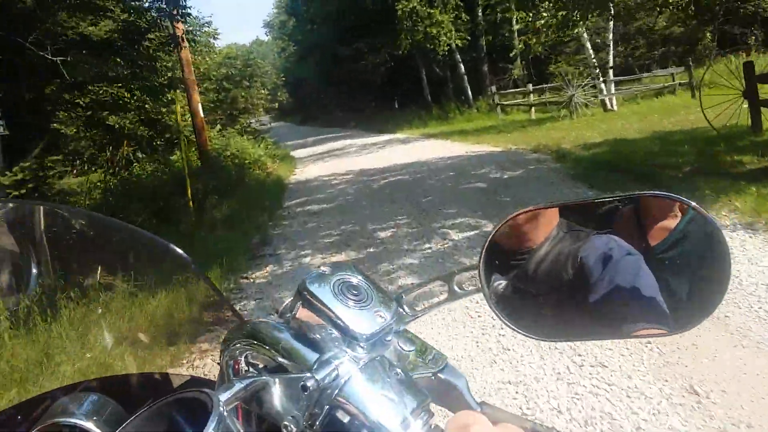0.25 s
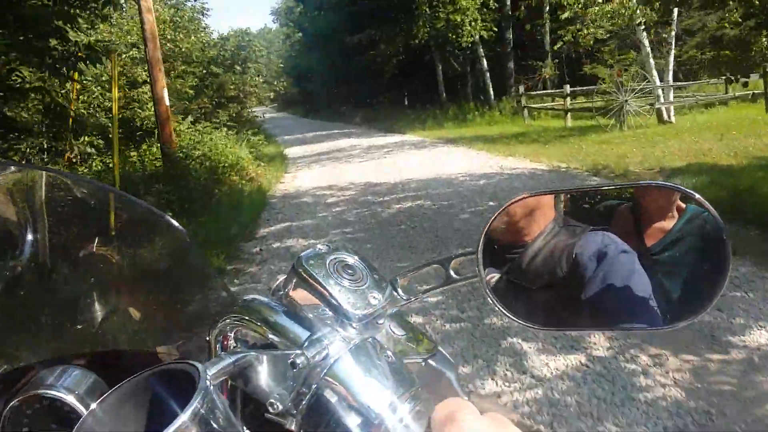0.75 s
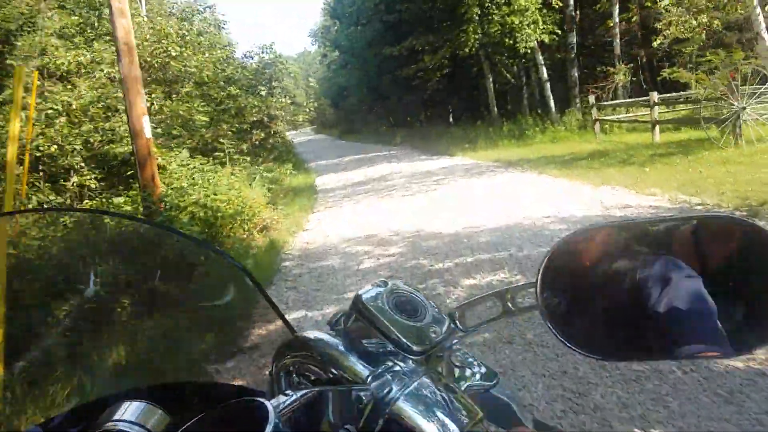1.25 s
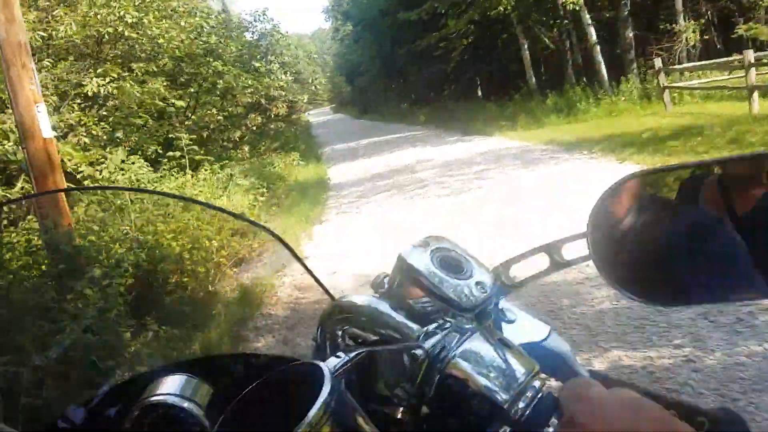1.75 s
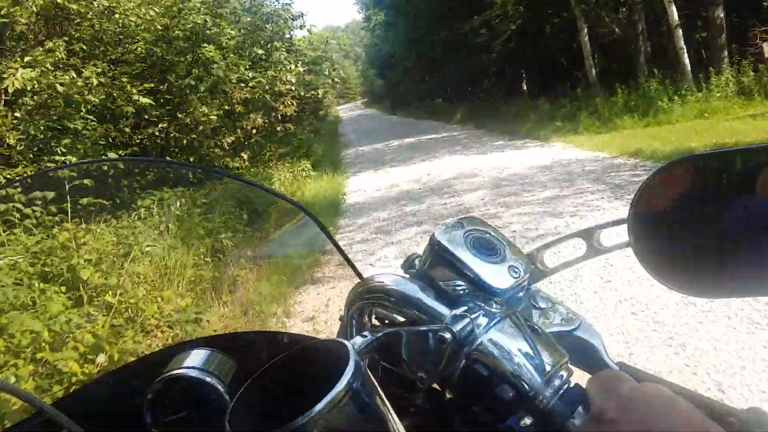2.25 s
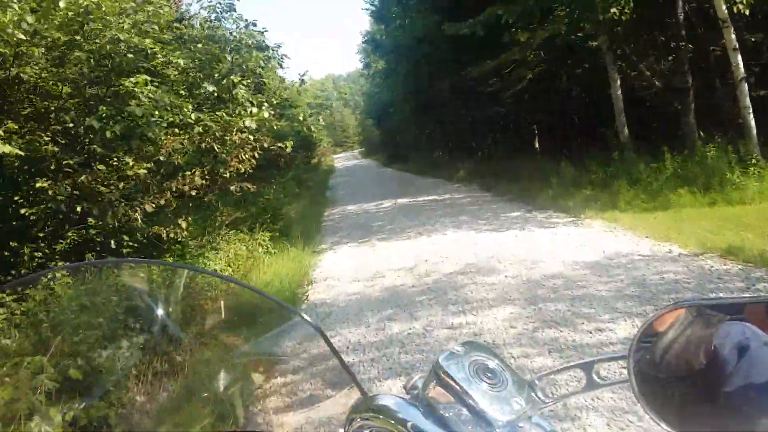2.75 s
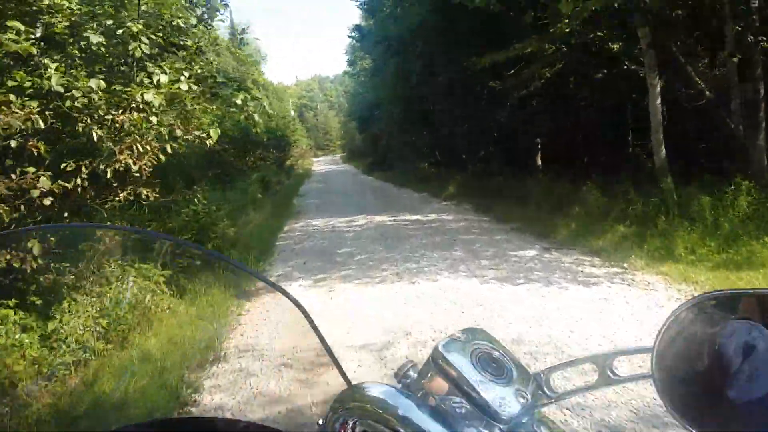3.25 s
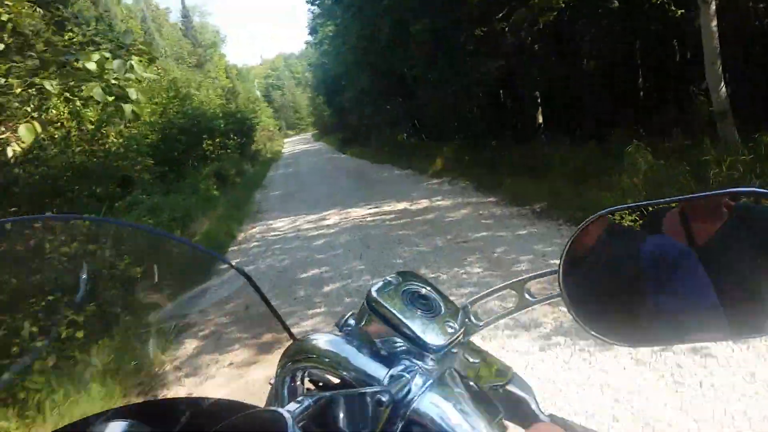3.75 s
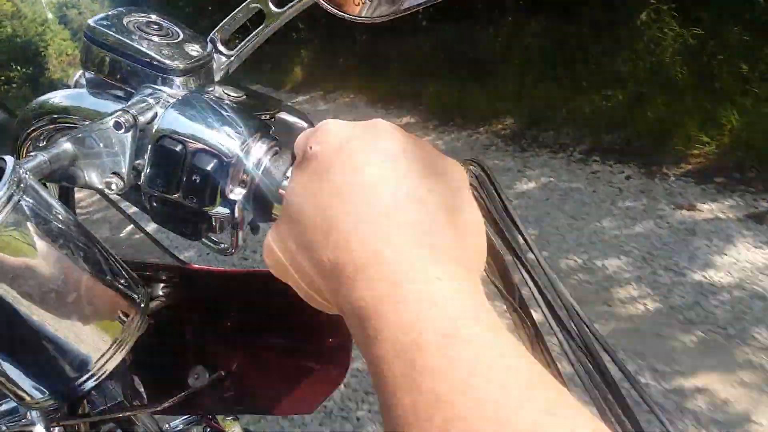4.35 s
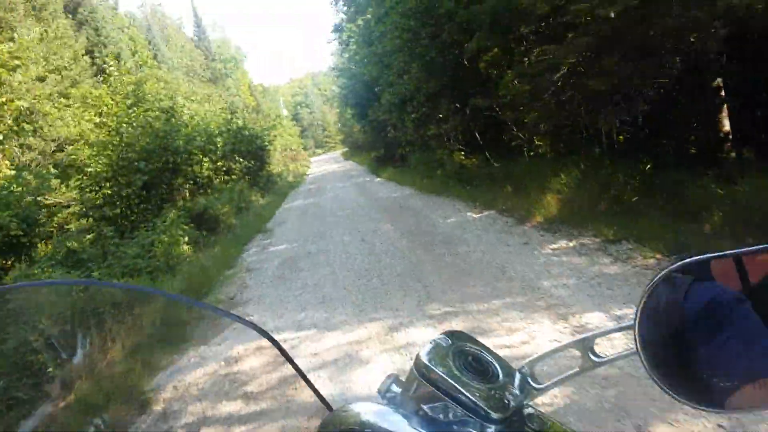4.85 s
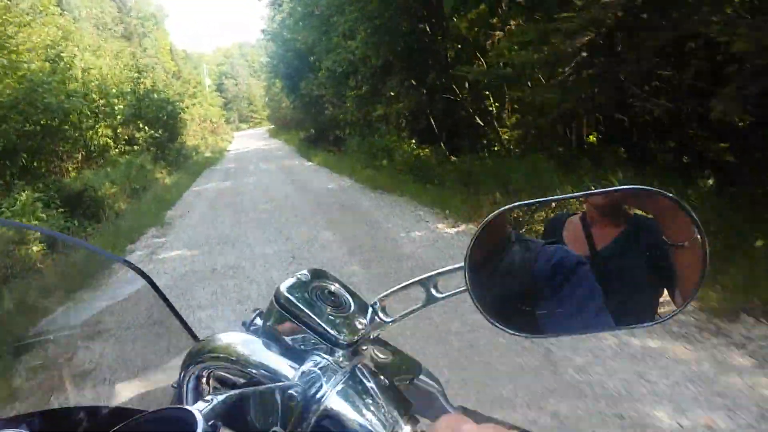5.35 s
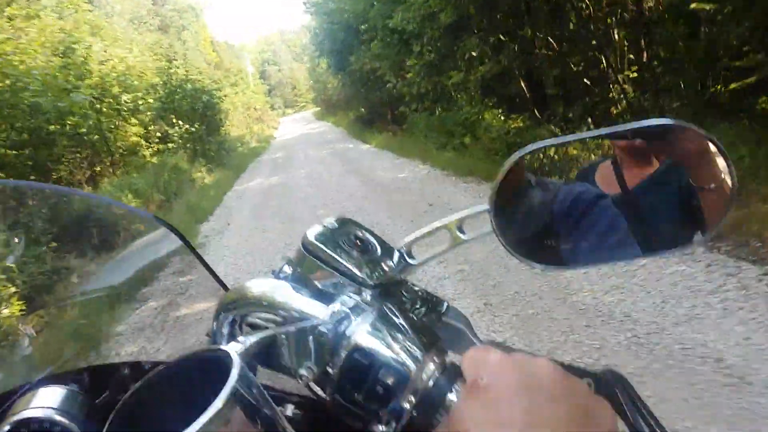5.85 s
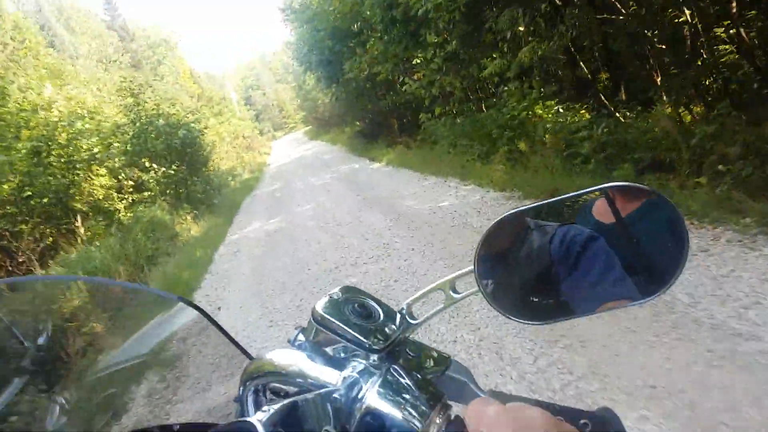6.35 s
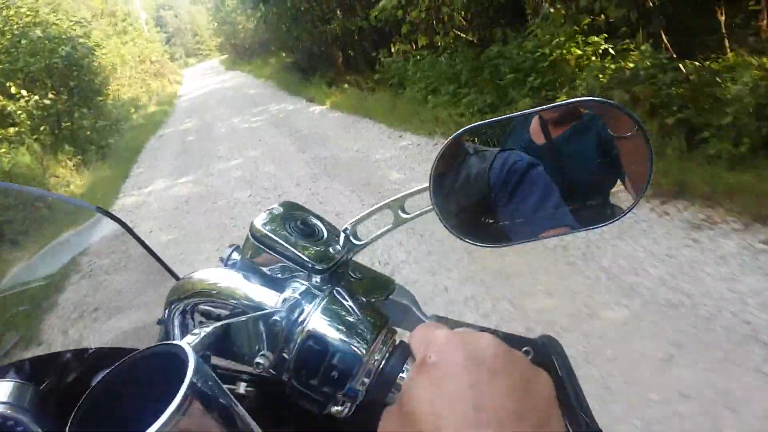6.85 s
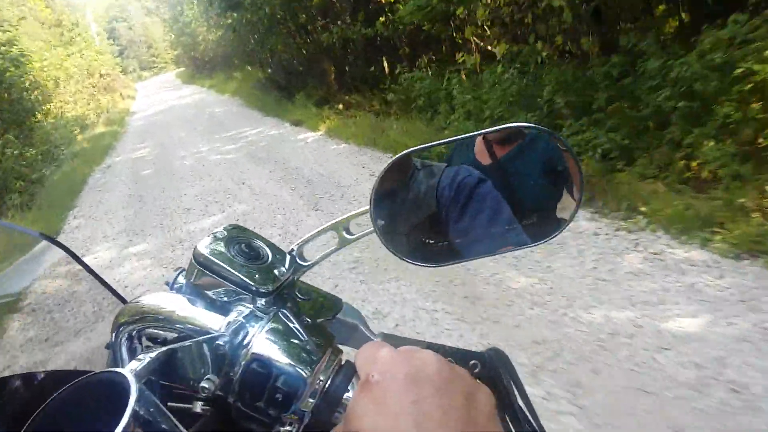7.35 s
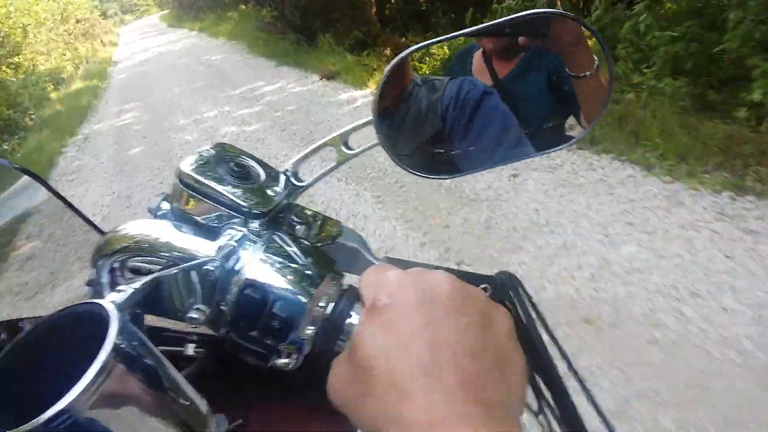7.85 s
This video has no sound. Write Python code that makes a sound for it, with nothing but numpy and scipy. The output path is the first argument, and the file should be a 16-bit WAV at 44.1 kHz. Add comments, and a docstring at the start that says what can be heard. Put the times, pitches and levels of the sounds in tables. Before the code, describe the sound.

A big motorcycle engine chugs steadily at low revs, heard from the seat, with tyres rumbling and crunching over gravel.

```python
"""Gravel road, from the rider's seat of a big V-twin cruiser chugging at low, steady revs.
Tyres rumble and crunch over stones; exhaust and bike give short, dull pops and knocks. Valve gear
clatters in a fixed order each cycle over the rustle of chain and gears. Gas pulses ring the pipes:
the front cylinder beats evenly, the rear one keeps falling into a miss-and-catch lope."""
import sys
import numpy as np
from scipy import signal
from scipy.fft import rfft, irfft, next_fast_len
from scipy.io import wavfile
from scipy.ndimage import uniform_filter1d

SR = 44100
rng = np.random.default_rng(int(sys.argv[2]) if len(sys.argv) > 2 else 0)


def wav_record(signal):
    """Record a signal, one row per channel, as 16-bit PCM in the file named by sys.argv[1]."""
    frames = np.transpose(np.atleast_2d(signal))
    bounded = np.clip(frames, -1, 1)
    # unit amplitude maps onto the largest positive 16-bit level
    quanta = np.round(bounded * 32767).astype(np.int16)
    wavfile.write(sys.argv[1], SR, quanta)


N = 356769
TIME_S = np.arange(N) / SR
FFT_SIZE = next_fast_len(N + SR // 2)
FREQ_HZ = np.maximum(np.arange(FFT_SIZE // 2 + 1) * SR / FFT_SIZE, 1e-3)


def undb(db):
    """Decibels to gain."""
    return 10 ** (np.asarray(db) / 20)


def level(x, rms_db):
    """Scale to an rms level."""
    return x * undb(rms_db) / np.sqrt(np.mean(x ** 2))


def curve(points):
    """Rows of (time_s, value), interpolated per sample."""
    return np.interp(TIME_S, *np.transpose(points))


def filtered(x, response):
    """Apply a frequency response."""
    return irfft(rfft(x, FFT_SIZE) * response, FFT_SIZE)[..., :N]


def colour(points):
    """Minimum-phase response from rows of (freq_hz, gain_db)."""
    hz, db = np.transpose(points)
    cepstrum = irfft(np.log(undb(np.interp(np.log(FREQ_HZ), np.log(hz), db))))
    cepstrum[1:FFT_SIZE // 2] *= 2
    cepstrum[FFT_SIZE // 2 + 1:] = 0
    return np.exp(rfft(cepstrum))


def resonance(hz, width_hz):
    """Band-pass response, gain 1 at the centre."""
    return 1 / (1 + 1j * (FREQ_HZ / hz - hz / FREQ_HZ) * hz / width_hz)


def clicks(times_s, sizes):
    """One impulse at each time."""
    return np.bincount(np.clip(times_s * SR, 0, N).astype(int), sizes, N + 1)[:N]


def bursts(times_s, sizes, decay_s):
    """Envelope that jumps at each time and decays."""
    return signal.lfilter([1], [1, -np.exp(-1 / (decay_s * SR))], clicks(times_s, sizes))


def scatter(events, spread_db):
    """One random gain around 1 per event."""
    return undb(spread_db * rng.standard_normal(len(events)))


def sway(rate_hz):
    """Slow random drift, spread near 1."""
    hold = int(SR / rate_hz)
    steps = np.repeat(rng.standard_normal(N // hold + 1), hold)
    return 1.7 * uniform_filter1d(uniform_filter1d(steps, hold), hold)[:N]


def pan(x, right_db):
    """Stereo balance, right over left."""
    return x * undb(np.array([[-right_db], [right_db]]) / 2)


def from_below(x, right_db):
    """Sound from below reaches the left side sooner, and again off the tank and screen."""
    lead_s, echo_s, echo_db = 0.00024, 0.004, -17.5
    direct = np.exp(2j * np.pi * FREQ_HZ * lead_s)
    echo = undb(echo_db) * np.exp(-2j * np.pi * FREQ_HZ * echo_s)
    return pan(np.array([filtered(x, direct + echo), x]), right_db)


def crank(phase_cycles):
    """Times in seconds at which the engine passes a phase of its four-stroke cycle."""
    # engine speed: time_s, cycle_rate_hz
    speed = [(0.0, 15.905), (0.79, 15.78), (2.37, 15.875), (2.57, 15.528), (2.96, 15.646), (3.16, 15.983),
             (3.55, 16.071), (3.75, 15.802), (5.33, 16.023), (5.52, 16.221), (6.51, 15.677), (6.71, 15.931),
             (7.5, 15.771), (7.7, 15.531), (8.09, 15.739)]
    cycles = np.cumsum(curve(speed)) / SR - 0.11
    return np.interp(np.arange(int(cycles[-1]) + 1) + phase_cycles, cycles, TIME_S, right=2 * N / SR)


def road_rumble():
    """Tyres rolling on the road: low noise, part direct, part diffuse."""
    # rumble spectrum: freq_hz, gain_db
    spectrum = [(15, -8.5), (35, -16), (55, -13), (85, -2.5), (130, 2.5), (220, 6.5), (320, 2.5),
                (500, -7.5), (900, -11.5), (2000, -63.5)]
    rumble = level(filtered(rng.standard_normal((3, N)), colour(spectrum)), 0)
    return from_below(rumble[0], right_db=2.6) * undb(-32) + rumble[1:] * undb(-24.5)


def gravel(treble_db):
    """Stones crack under the tyres, a few of them loudly."""
    # crack spectrum: freq_hz, gain_db
    spectrum = [(1000, 10.5), (4000, 24.5), (7000, 7), (9000, -17.5), (12000, -3.5), (15500, -6.5)]
    # loud single stones: start_s, relative_db
    stones = [(0.9278, -36), (1.55, -39), (3.689, -47), (5.473, -38), (6.1115, -37), (7.8291, -36)]
    count = 9000
    patches_db = 4.5 * sway(rate_hz=20)  # loose and packed ground
    sides = []
    for _ in range(2):
        sizes = undb(4.6 * np.minimum(rng.exponential(size=count), 6)) * rng.choice([-1, 1], count)
        sides.append(clicks(rng.uniform(0, N / SR, count), sizes))
    chip = rng.standard_normal(SR // 100) * np.exp(-TIME_S[:SR // 100] / 0.00077)
    crunch = filtered(np.array(sides), colour(spectrum) * rfft(chip, FFT_SIZE))
    start_s, relative_db = np.transpose(stones)
    cracks = bursts(start_s, undb(relative_db - 7), decay_s=0.0017) * rng.standard_normal((2, N))
    return level(crunch, -64 + 1.8 * treble_db + patches_db) + filtered(cracks, colour(spectrum))


def pops_and_knocks():
    """Short, dull pops and knocks from the exhaust and the bike; light ones come at random."""
    # hard pops and knocks: start_s, level_db, pitch_hz
    hard = [(0.762, -17, 576), (0.875, -11, 536), (1.116, -13.5, 522), (1.268, -11, 522), (1.682, -17, 654),
            (1.901, -16, 624), (1.968, -15.5, 568), (2.561, -15.5, 522), (3.759, -15, 790),
            (4.262, -20, 850), (4.792, -14, 620), (6.247, -14.5, 541), (6.6, -17, 581), (6.999, -12, 600),
            (7.091, -18, 720), (7.407, -17, 540), (8.015, -13.5, 560)]
    light_count, spread_db, spread_oct = 18, 2, 0.19
    attack_s, decay_s = 0.00085, 0.0037
    size, pitch = rng.standard_normal((light_count, 2)).T
    light_s = rng.uniform(0, N / SR, light_count)
    light = list(zip(light_s, -21 + spread_db * size, 624 * 2 ** (spread_oct * pitch)))
    out, t = np.zeros(N + SR), TIME_S[:SR // 20]
    for start_s, level_db, pitch_hz in hard + light:
        phase = 2 * np.pi * pitch_hz * t
        ring = np.sin(phase) + 0.51 * np.sin(1.45 * phase) + 1.25 * np.sin(0.74 * phase)
        ring *= (1 - np.exp(-t / attack_s)) ** 2 * np.exp(-t / decay_s)
        i = int(start_s * SR)
        out[i:i + len(t)] += undb(level_db) * ring / abs(ring).max()
    return from_below(out[:N], right_db=1)


def valve_gear(treble_db):
    """Tappets strike in a fixed order over the rustle of chain and gears; metal and covers ring."""
    # tappet strikes: phase_cycles, relative_db
    tappets = [(0, -7.5), (.22, -15), (.32, -16.5), (0.45, -8.5), (0.49, -17.5), (.69, -9), (.93, -21)]
    # clatter spectrum: freq_hz, gain_db
    clatter_spectrum = [(500, -18), (900, -1), (1250, -4.5), (1500, -0.5), (2000, -6), (2300, -8.5),
                        (2900, -14.5), (3400, -21), (4500, -24), (8000, -42.5)]
    # engine metal modes: centre_hz, width_hz, gain_db
    metal_modes = [(1161, 50, 3.5), (1388, 67, 4.5), (1878, 44, 7), (2000, 20, -6.5), (4726, 84, -2.5),
                   (6700, 170, -20.5)]
    # level of the cover ring over time: time_s, level_db
    cover_levels = [(0, -47.5), (1.5, -59), (2.7, -52), (3.3, -46), (3.9, -51), (4.45, -43.5), (5.6, -49),
                    (6.2, -49.5), (8, -49)]
    # hiss spectrum: freq_hz, gain_db
    hiss_spectrum = [(2000, -13), (3200, -7), (3900, -2), (4700, 0.5), (5200, -3.5), (5750, -4.5),
                     (6300, -13), (6800, -14), (7500, -23.5), (9500, -30.5), (15000, -37.5)]
    strikes = np.zeros(N)
    for phase_cycles, relative_db in tappets:
        times_s = crank(phase_cycles)
        strikes += bursts(times_s, undb(relative_db) * scatter(times_s, spread_db=3), decay_s=0.0096)
    strikes = uniform_filter1d(strikes, size=130)  # 3 ms to spread through the cases
    clatter, metal, covers, hiss = (rng.standard_normal((2, N)) * (strikes + rustle)
                                    for rustle in (0.34, 0.45, 0.36, 0.58))
    clatter = level(filtered(clatter, colour(clatter_spectrum)), -38.37)
    metal_ring = sum(undb(db) * resonance(hz, width_hz) for hz, width_hz, db in metal_modes)
    metal = level(filtered(metal, metal_ring), -41.7)
    cover_ring = resonance(2840, width_hz=90) + resonance(3037, width_hz=50)
    covers = level(filtered(covers, cover_ring), curve(cover_levels))
    hiss = level(filtered(hiss, colour(hiss_spectrum)), -39.63 + 0.77 * sway(rate_hz=16))
    return (pan(clatter + metal, right_db=-0.9) + pan(hiss, right_db=3.5)) * undb(treble_db) + covers


def gas_rasp(front_s, rear_s, burn_strength):
    """Turbulent gas: a puff on each beat over a steady flow."""
    # rasp spectrum: freq_hz, gain_db
    spectrum = [(60, -40), (150, -16), (280, 7.5), (420, -2), (600, -3.5), (820, -4.5), (1100, -13),
                (1600, -19.5), (3000, -53)]
    puffs = bursts(front_s + 0.0021, scatter(front_s, spread_db=4), decay_s=0.0018)
    rear_sizes = (0.29 + 0.4 * burn_strength) * scatter(rear_s, spread_db=5.5)
    puffs += bursts(rear_s, rear_sizes, decay_s=0.0052)
    turbulence = (puffs + 0.8) * rng.standard_normal((3, N))
    rasp = level(filtered(turbulence, colour(spectrum)), 2.5)
    return from_below(rasp[0], right_db=0.5) + rasp[1:]  # direct + scattered by bike and ground


def side_panel(front_s, rear_s):
    """Each beat sets a panel on the left ringing hollowly."""
    taps = clicks(front_s + 0.00194, scatter(front_s, spread_db=4.5))
    taps += clicks(rear_s - 0.0008, undb(2) * scatter(rear_s, spread_db=1.5))
    ring = filtered(taps, resonance(790, width_hz=100) * resonance(810, width_hz=1100))
    return pan(level(ring, -10.5), right_db=-3.5)


def front_bark(front_s):
    """The first rush of gas from the nearer, front pipe: a short, bright bark."""
    envelope = bursts(front_s + 0.0022, scatter(front_s, spread_db=2.5), decay_s=0.002)
    rush = envelope * rng.standard_normal((2, N))
    return level(filtered(rush, resonance(1300, width_hz=1800) ** 2), -47)


def rear_burns(times_s):
    """Strength of each rear burn. A miss leaves fresh mixture behind, so the next burn is hard."""
    # spells of missing every other cycle: first_miss_s, last_miss_s
    lope = [(0.04, 0.29), (1.17, 1.43), (3.2, 3.33), (4.02, 4.14), (4.58, 5.09), (5.33, 5.83), (6.9, 7.28),
            (7.79, 7.92)]
    miss_loss, regained_share = 0.93, 0.34
    stumble_chance, stumble_loss = 0.17, 0.95  # lone weak burns between spells
    lost = stumble_loss * (rng.random(len(times_s)) < stumble_chance)
    for spell in lope:
        first, last = (np.argmin(abs(times_s - miss_s)) for miss_s in spell)
        lost[first:last + 2] = 0
        lost[first:last + 1:2] = miss_loss
    regained = regained_share * np.r_[0, lost[:-1]]
    return (1 - lost + regained) * scatter(times_s, spread_db=0.07)


def pipe(times_s, sizes, modes):
    """Rounded gas pulses ring a pipe; its small mouth radiates no deep bass."""
    highpass_hz, lowpass_hz = 52, 1400
    s = 1j * FREQ_HZ / highpass_hz
    mouth = (s * s / (s * s + s + 1)) ** 2
    rounding = 1 / (1 + 1j * FREQ_HZ / lowpass_hz) ** 2
    ring = sum(polarity * undb(db) * resonance(hz, width_hz) for hz, width_hz, db, polarity in modes)
    period_s = np.median(np.diff(times_s))
    return filtered(clicks(times_s, sizes * period_s * SR), ring * mouth * rounding)


def exhaust():
    """Two unevenly spaced beats a cycle ring the pipes, with rasp, panel ring and bark."""
    # front pipe modes: centre_hz, width_hz, gain_db, polarity
    front_modes = [(78.7, 14.8, -16.5, -1), (80.7, 26.1, -20.5, 1), (139.8, 23.1, -29.5, 1),
                   (204.7, 28.8, -20.5, -1), (220.83, 14.9, -24, 1), (267.9, 5, -27.5, -1),
                   (278, 70, -36, 1), (588.7, 30, -43.5, -1)]
    # rear modes rung by the valve opening, burn or no burn: centre_hz, width_hz, gain_db, polarity
    rear_modes = [(101, 99, -34, 1), (120.85, 10.65, -24, -1), (175, 30.3, -32.5, -1)]
    # rear modes rung by the burn: centre_hz, width_hz, gain_db, polarity
    burn_modes = [(79.6, 17.8, -28, -1), (107.5, 28.7, -25.5, 1), (127.2, 17.5, -32, -1),
                  (151.5, 39, -33, 1), (230.6, 46.4, -31.5, -1)]
    # swell of rasp and panel: time_s, gain_db
    rasp_gain = [(0, -32.5), (.85, -35), (1.2, -35), (2.45, -32.5), (2.75, -39.5), (3.2, -35), (4.0, -35),
                 (4.55, -35.5), (4.8, -32.5), (5.1, -39.5), (5.65, -32), (6.3, -34.5), (7.75, -33.5),
                 (8.09, -40)]
    front_s, burn_s, rear_s = crank(-0.033), crank(0.409), crank(0.450)
    burn_strength = rear_burns(rear_s)
    burn_s += 0.0003 * rng.standard_normal(len(burn_s))  # flame speed varies per cycle
    beat = pipe(front_s, scatter(front_s, spread_db=0.3), front_modes)
    beat += pipe(rear_s, scatter(rear_s, spread_db=1.9), rear_modes)
    beat += pipe(burn_s, burn_strength, burn_modes)
    beat = from_below(beat, right_db=3) * undb(-0.34)
    rasp_and_panel = gas_rasp(front_s, rear_s, burn_strength) + side_panel(front_s, rear_s)
    return beat + rasp_and_panel * undb(curve(rasp_gain)) + front_bark(front_s)


def scene():
    """Engine and road, all moving with the rider."""
    # treble drift of valve gear, chain and gravel: time_s, relative_db
    treble = [(0, -0.4), (2.0, 1.1), (2.8, -0.3), (3.4, 1), (4.1, -0.5), (4.4, 0.8), (5.7, 1), (5.9, -0.8),
              (6.6, -1), (6.9, 0.4), (7.5, -1), (8.09, 0.7)]
    treble_db = curve(treble)
    return exhaust() + valve_gear(treble_db) + pops_and_knocks() + gravel(treble_db) + road_rumble()


def record(dry):
    """Steep low-pass on the top treble."""
    cutoff_hz = 15500
    return signal.sosfilt(signal.ellip(10, 0.1, 80, cutoff_hz, fs=SR, output="sos"), dry)


dry = scene()
out = record(dry)
wav_record(out)
```